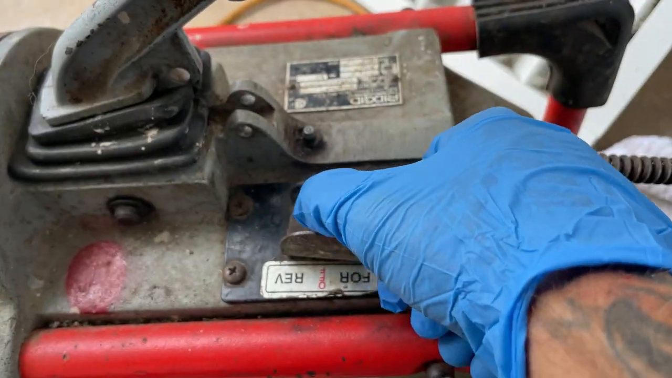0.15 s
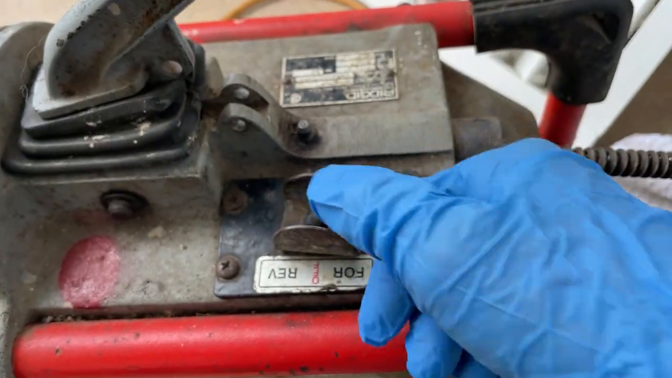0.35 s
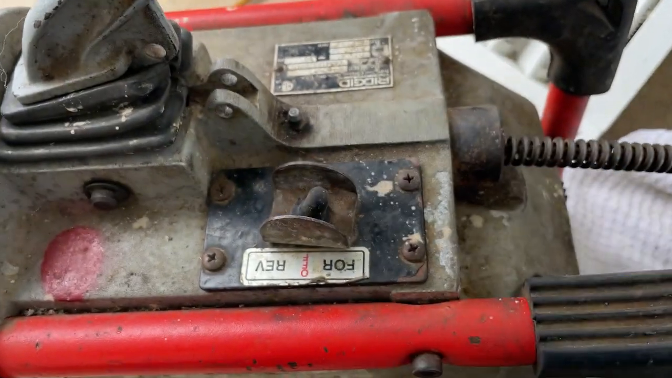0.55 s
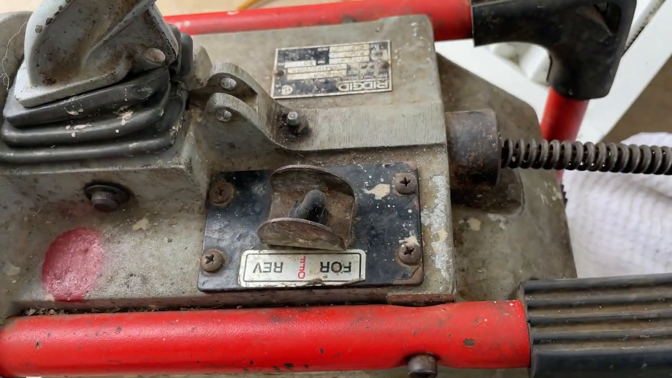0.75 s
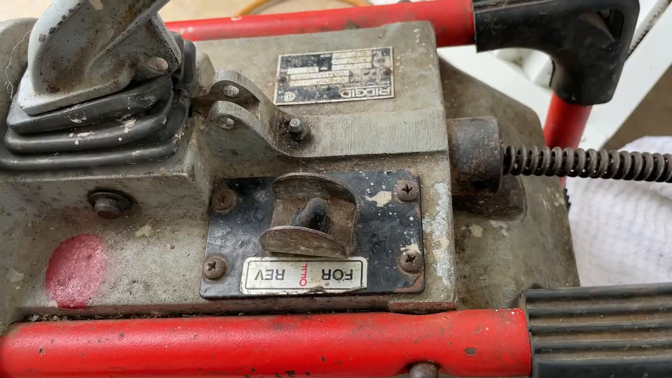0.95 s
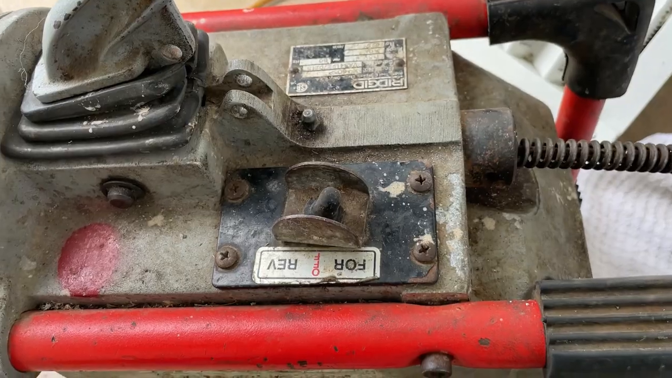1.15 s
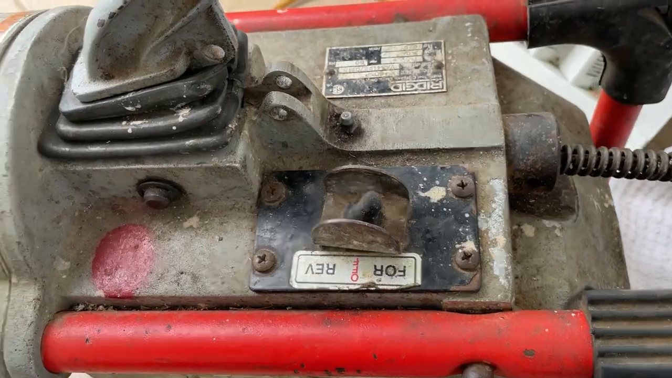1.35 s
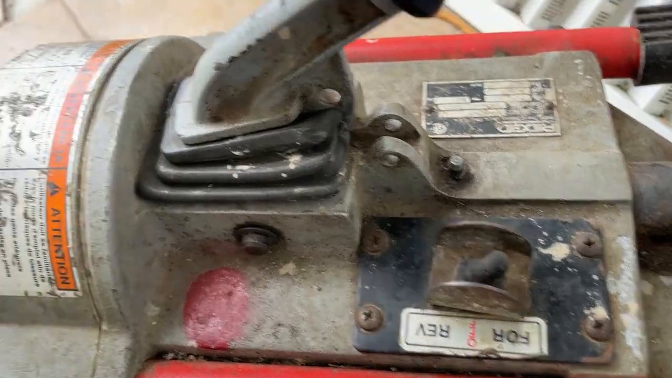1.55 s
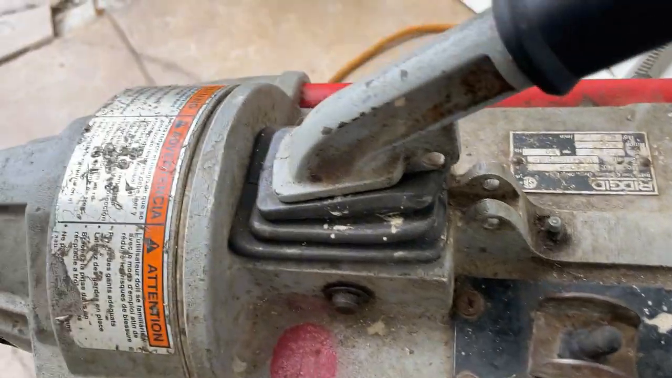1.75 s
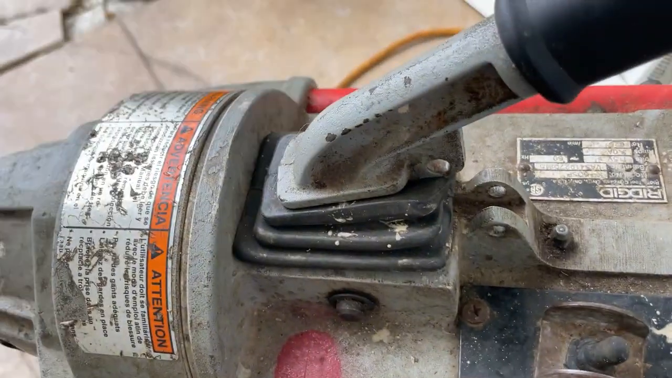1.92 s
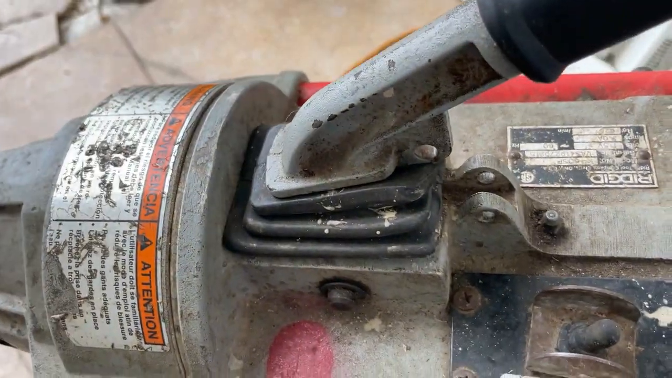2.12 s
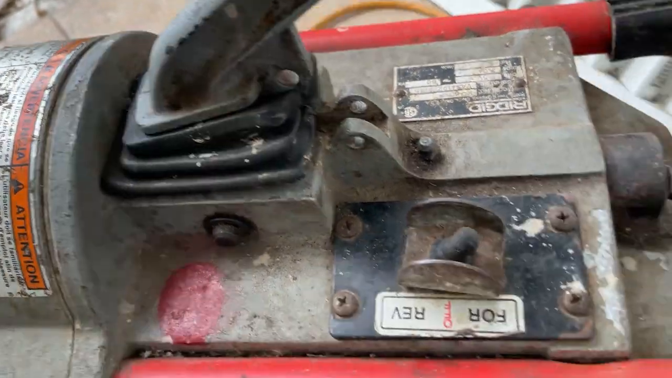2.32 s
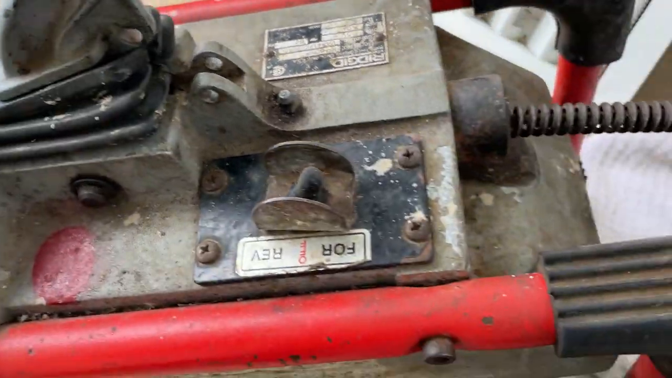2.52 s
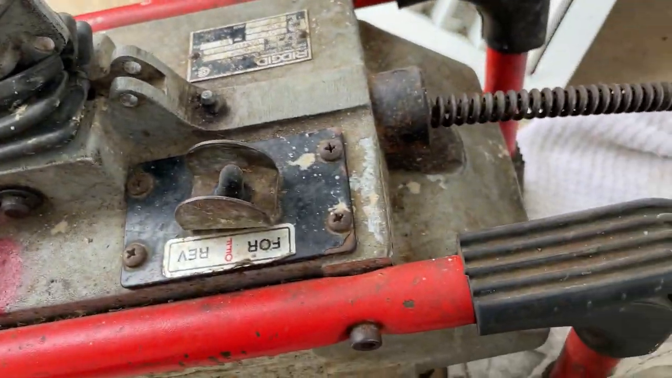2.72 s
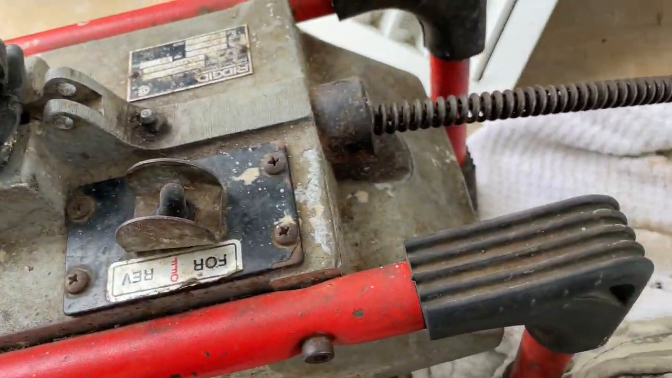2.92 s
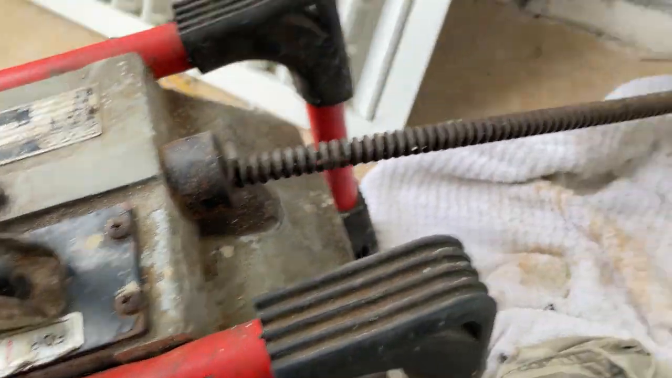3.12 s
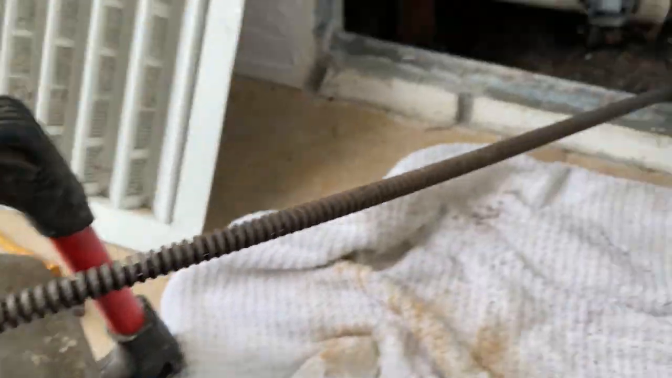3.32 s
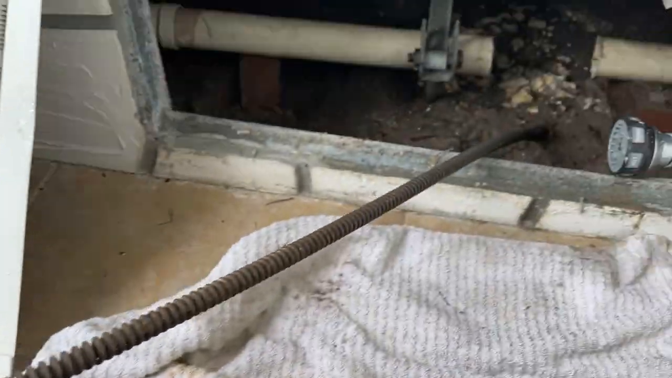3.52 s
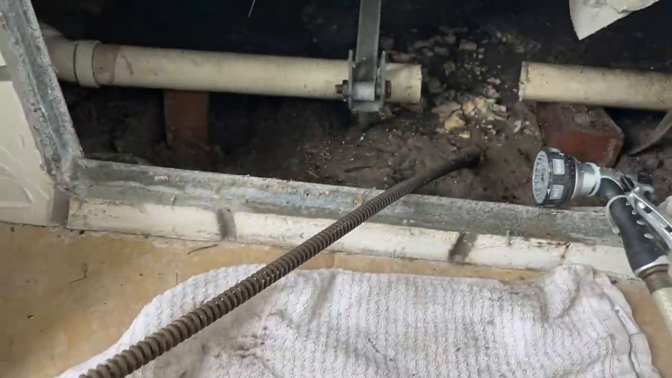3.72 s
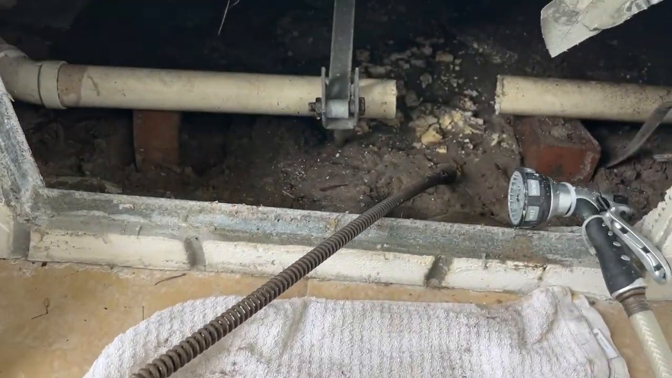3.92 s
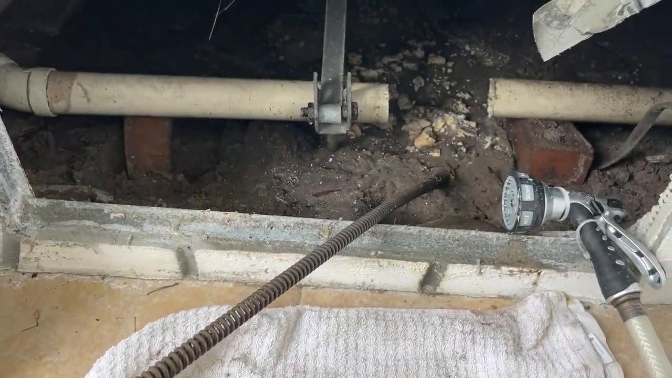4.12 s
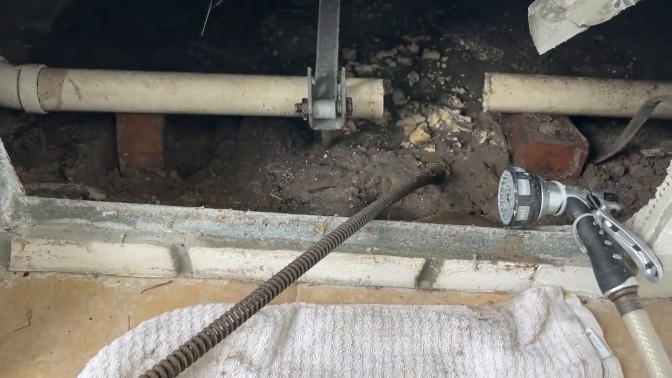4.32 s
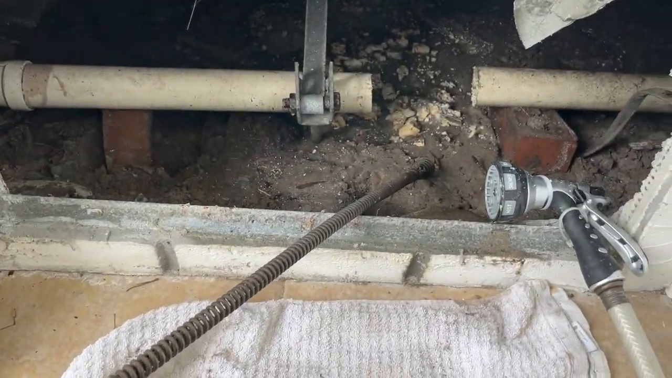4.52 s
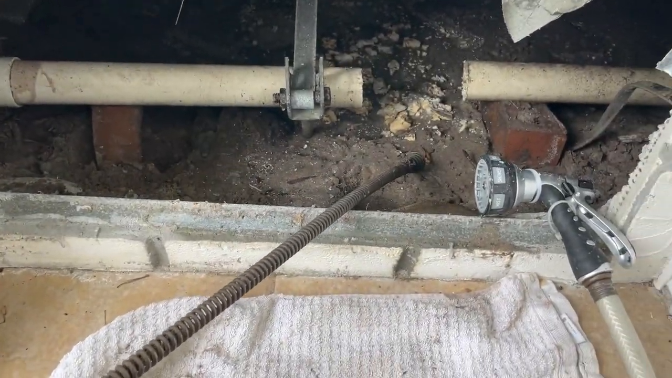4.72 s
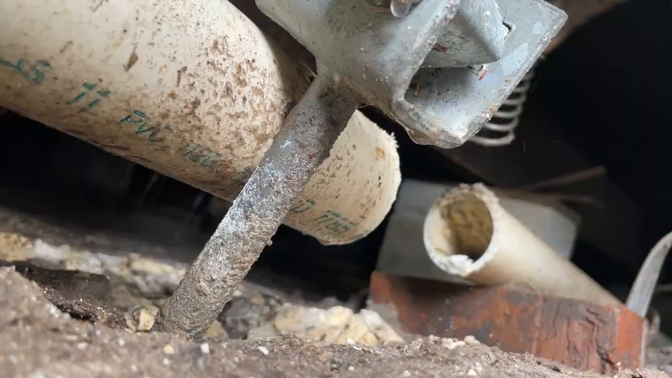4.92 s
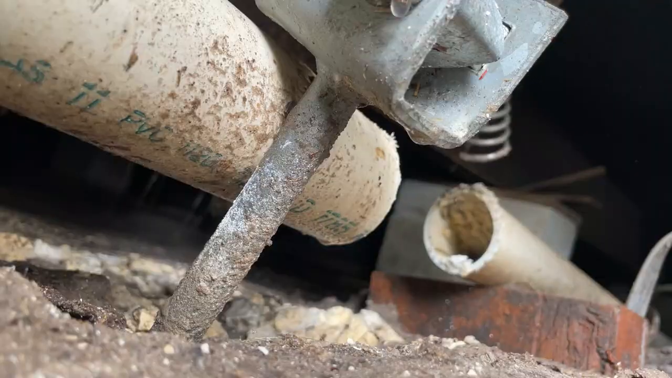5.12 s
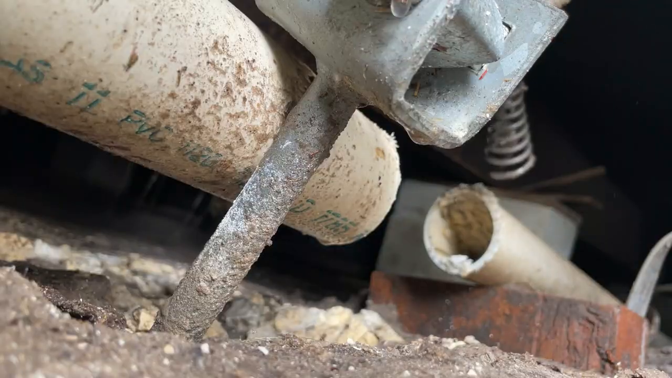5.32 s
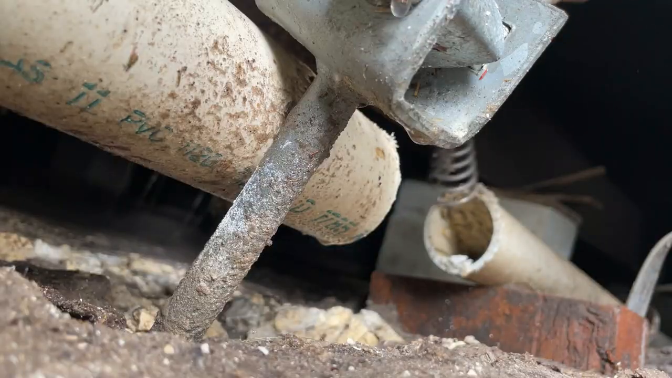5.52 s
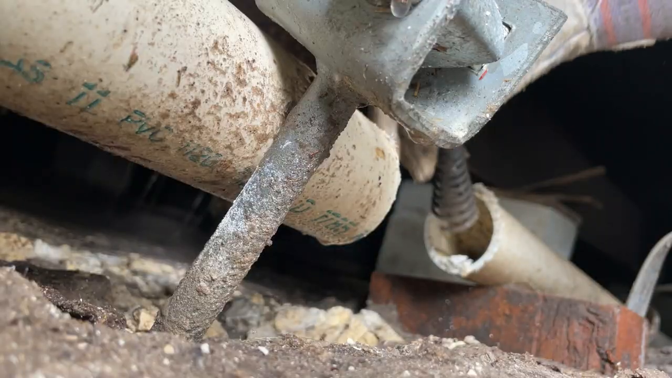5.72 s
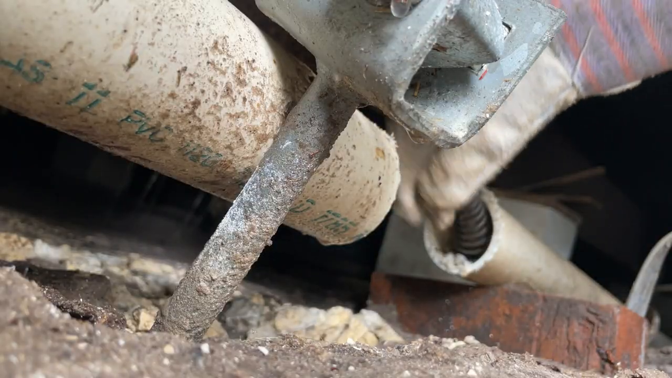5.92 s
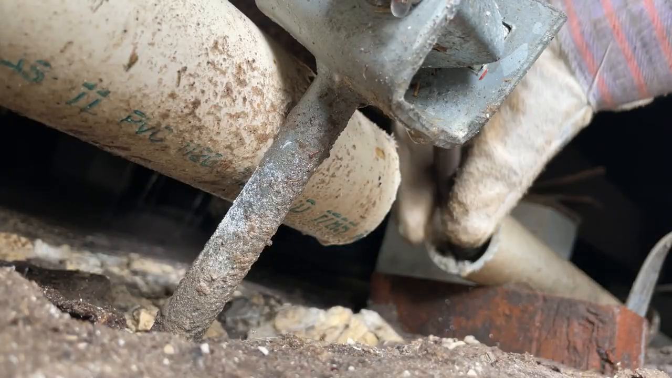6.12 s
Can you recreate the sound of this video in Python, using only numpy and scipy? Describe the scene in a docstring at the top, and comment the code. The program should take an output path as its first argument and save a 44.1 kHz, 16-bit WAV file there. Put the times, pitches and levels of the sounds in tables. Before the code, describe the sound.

Heavy switch clack, motor shudders up and hums with rapid thumping while a spinning coil cable rattles, squeals faintly, and finally scrapes into a plastic pipe.

```python
"""Drain-cleaning machine beside a house

An electric drain-cleaning machine is switched on and spins its coiled steel cable into a pipe.
The motor hums on mains and rotational lines, the belt drive thumps the housing once a turn, and
filtered noise gives the frame and the cable, which rattles, sings and ticks six times a turn.
The microphone starts at the machine, swings to a trench and ends under the floor, where the air rumbles."""
import sys
import numpy as np
from scipy import signal
from scipy.fft import rfft, irfft, next_fast_len
from scipy.io import wavfile
from scipy.ndimage import uniform_filter1d

SR = 44100
rng = np.random.default_rng(int(sys.argv[2]) if len(sys.argv) > 2 else 0)


def to_wav(s):
    """Save 16-bit WAV."""
    ch = np.atleast_2d(s).T  # columns
    pcm = np.round(np.clip(ch, -1, 1) * 32767)  # PCM
    wavfile.write(sys.argv[1], SR, pcm.astype(np.int16))


N = 276066
T = np.arange(N) / SR  # time axis, s

MAINS_HZ = 60
MOTOR_HZ, FIRST_THUMP_S = 29.875, .3634
CABLE_HZ, FIRST_TICK_S = 10.433, .2949
RUN_UP_S, RUN_UP_DB = 0.22, 17.5  # the frame's sound rises by this much after the switch
PORT_LAG_S = 0.000187  # the coil's treble reaches the microphone's right port this much later
YARD_WET_DB, YARD_T60_S = -10, .11  # faint reflections from ground and wall
CUTOFF_HZ = 15900

# Motor hum at each place: line_hz (nominal), level_db (rms)
HUM_MACHINE = [(120, -43.5), (300, -30), (420, -36.5), (450, -43.5), (480, -39.5), (540, -45), (630, -42.5)]
HUM_TRENCH = [(120, -39), (150, -42.5), (300, -36.5), (420, -34), (480, -45), (540, -51.5)]
HUM_UNDER = [(120, -41), (150, -44.5), (210, -44), (270, -39.5), (300, -41.5), (360, -40.5), (450, -48),
             (480, -44.5), (540, -45.5)]
# Hum lines locked to half the mains rate, the others follow the motor: order (multiple)
MAINS_ORDERS = (4, 5, 10, 16)
# Slow swell of the drone: time_s, housing_db, frame_db
DRONE = [(0.4, -4.5, 0), (1.5, 2.5, -0.5), (1.8, 2, -2.5), (2.35, 1.5, -2.5), (2.7, 0, 1), (3.85, 4, -1.5),
         (4.45, -1.5, -2), (5.4, 8, 4)]
# Growl of the starting current: line_hz, level_db (rms, before the swell)
GROWL = [(360, -31.5), (480, -29.5)]
# Swell of the growl: time_s, gain_db
GROWL_SWELL = [(0.13, -19), (0.19, -14), (0.255, -3), (0.33, -5), (0.4, -12), (0.5, -70)]
# One lap of the belt, a row for each of its four motor turns: thump_db, slap_db (of the cable)
BELT = [(-1, -11.5), (-1.5, -4), (-3, -38), (-7, -3.5)]
# Turns on which the thump has a set time and level: peak_s, peak_db
THUMPS = [(0.36, -12), (0.494, -16.5), (0.537, -14.5), (0.669, -18), (0.699, -17.5), (0.773, -11.5),
          (0.802, -14), (0.905, -13.5), (1.039, -18), (1.172, -15), (1.304, -18), (1.371, -17),
          (1.44, -13.5), (1.471, -16.5), (1.573, -13), (1.605, -14.5), (1.741, -16), (1.874, -14.5),
          (2.005, -13), (2.141, -12), (2.245, -16), (2.511, -10), (2.542, -13.5), (2.609, -14),
          (2.647, -16), (2.815, -17), (2.914, -16.5), (2.979, -16), (3.048, -15.5), (3.077, -18),
          (3.11, -20), (3.18, -11), (3.21, -17), (3.279, -17), (3.345, -16.5)]
# Resonances of housing and frame: mode_hz, width_hz, machine_db, trench_db, under_floor_db
FRAME = [(153, 65, -35, -4, -3.5), (258.2, 50, 0.5, -0.5, 1.5), (309.6, 37.4, 3, 2, 3),
         (338.4, 101, 1.5, -2.5, 3), (421.7, 34.5, -0.5, 1, -2), (474, 70, 1.5, -3.5, 4.5)]
# Spectrum of the rattle at each place: pitch_hz, level_db (relative)
RATTLE_MACHINE = [(350, -24.5), (600, 1), (720, -2.5), (999, -8), (1220, -8), (2240, -14), (2460, -11),
                  (3180, -17.5), (4100, -13), (5300, -20.5), (7600, -21.5), (9880, -100)]
RATTLE_TRENCH = [(350, -50), (600, 3), (947, -1), (1030, -8), (1300, -2), (1610, -7), (1850, -3.5),
                 (2630, -6), (3210, -8.5), (4100, -3), (7600, -25.5), (9880, -100)]
RATTLE_UNDER = [(350, -27), (600, 3.5), (1080, -8.5), (1250, -4), (1470, -11.5), (1800, -9), (2190, -13),
                (4660, -18.5), (7600, -20.5), (9880, -95)]
# Resonances of the steel cable at each place: mode_hz, width_hz, level_db (relative)
RING_MACHINE = [(1770, 150, -6.5), (3430, 42, -6), (3770, 56, -6), (4056, 81, -1), (7310, 60, -1)]
RING_TRENCH = [(925, 35, 0), (1325, 35, -5), (2374, 54, 0.5), (2570, 30, 3), (2750, 22, 3), (4000, 310, 0),
               (5820, 180, -9.5)]
RING_UNDER = [(1800, 62, -16), (6830, 89, -6.5)]
# Friction on the cable, slack, then taken up, at last guided into the pipe: time_s, gain_db
FRICTION = [(0.2, -5.5), (0.225, -17), (0.264, -13), (0.273, -4.5), (0.299, -9), (0.308, 1.5), (0.36, 4.5),
            (4.96, 5.5), (5.0, -1), (5.07, 5), (5.16, -2), (5.28, 6.5), (5.41, 0), (5.83, 0), (5.95, 4),
            (6.26, 3)]
# Loud single clacks: the switch contact rebounding, the cable knocking, at last loud ticks of the coil:
# start_s, peak_db, treble_db (relative to the peak)
CLACKS = [(0.196, -32.5, -17), (0.267, -35.5, -9), (0.305, -32, -5), (0.931, -23, -12), (1.565, -25, -8),
          (1.698, -23, -12), (1.864, -26.5, -10), (1.97, -25, -11), (2.101, -21.5, -14), (2.132, -29, -9),
          (2.506, -24, -10), (2.639, -23, -7), (2.803, -21, -18), (2.937, -25.5, -13), (3.071, -24, -19),
          (3.171, -25, -18), (5.57, -37, -1.5), (5.621, -31, -23), (5.889, -36, 3.5), (5.95, -30, -2),
          (5.966, -31, -1), (6.017, -36, 1), (6.179, -33.5, 3)]
# Spectra of a clack and of its bright edge: pitch_hz, level_db (relative)
CLACK_COLOUR = [(450, -7), (700, -0.5), (1130, 6.5), (1800, -5.5), (2400, -10), (4000, -35)]
CLACK_EDGE = [(1700, -13), (2800, 4), (4200, -3), (7000, 6), (8300, -33), (10500, 5), (15000, -17)]
# The cable sings briefly as it bends: start_s, end_s, start_hz, end_hz, level_db (rms)
SINGS = [(1.42, 2.44, 2550, 2550, -43.5), (1.543, 2.35, 1330, 1322, -48.5), (2.48, 3.218, 2400, 2370, -45),
         (3.18, 3.998, 2506, 2910, -50), (3.42, 3.822, 2775, 2735, -47), (3.703, 5.01, 1800, 1793, -46.5),
         (4.2, 4.6, 3450, 3430, -48), (4.75, 5.15, 3490, 3460, -50), (4.95, 5.38, 1874, 1856, -52),
         (5.95, 6.35, 1815, 1800, -52.5)]
# Where in each turn the coil catches: share (of the turn), level_db (relative)
COIL = [(0.163, 4), (0.328, 2), (0.517, -6), (0.637, 0.5), (0.824, -0.5), (0.955, -9)]
# Spectrum of the coil's ticks: pitch_hz, machine_db, trench_db, under_floor_db (relative)
TICK = [(6900, -2, -35, -24), (7210, -23, 8, -1), (9500, 9.5, 4.5, 0), (10130, 3.5, 12.5, 3),
        (11100, 0.5, 5, 0.5), (12400, -0.5, 5.5, -0.5), (14800, 4.5, 6, -0.5), (15400, -18, -8, -10)]
# The switch snaps over: start_s, level_db
SWITCH = [(0.1299, -14.5)]
# Spectrum of the snap: pitch_hz, level_db (relative)
SWITCH_COLOUR = [(400, 4), (2300, -6), (3000, 5.5), (3700, 3), (4600, -7), (6600, 1), (9000, -14),
                 (11400, 8), (12800, -12)]
# Modes of the switch's metal case: mode_hz, level_db, t60_s
SWITCH_CASE = [(507, -27, 0.064), (1740, -26.5, 0.066), (3180, -37, 0.048), (4651, -33, 0.11),
               (5840, -19, 0.036), (7600, -22, 0.06), (11800, -33, 0.06)]
# The drive takes up its slack with a jolt: start_s, level_db
JOLT = [(0.345, -19)]
# The cable end scrapes the pipe mouth: start_s, length_s, level_db, ring_db (relative to the stroke)
SCRAPES = [(5.27, 0.063, -36, 18.5), (5.926, 0.067, -44.5, 3), (6.008, 0.057, -38, 6)]
# Resonances of the plastic rim: mode_hz, width_hz, level_db (relative)
RIM = [(1200, 60, 4.5), (2630, 57, 5), (5990, 150, -4), (7310, 89, -3)]
# Spectra of the low rumble and of the outdoor air: pitch_hz, level_db (relative)
RUMBLE = [(20, -53), (36, -16), (50, 0.5), (68, 0.5), (90, -5.5), (125, -22.5), (200, -17)]
YARD_AIR = [(100, 6), (200, -9), (340, 4.5), (700, -10.5), (1100, -14), (3000, -33.5), (12000, -42)]
# Swells of the rumble: top_s, length_s, gain_db
SWELLS = [(4.54, 0.1, 6), (5.212, 0.12, 8.5), (5.38, 0.065, 7), (5.553, 0.3, 5), (5.688, 0.12, 7),
          (5.93, 0.063, 5.5), (6.08, 0.09, 7), (6.172, 0.13, 7.5)]
# Position of the microphone: time_s, place (0 machine, 1 trench, 2 under the floor)
PLACE = [(0, 0), (3.25, 0.18), (3.48, 0.94), (4.92, 1), (5.05, 2)]
# Stereo balance: time_s, left_minus_right_db
PAN = [(0.8, -2), (2.23, -3.5), (3.2, -1), (3.85, 0.5), (4.95, 0.5), (5.05, -3.5), (6.26, -3)]
# Base levels, a row for each place: thump_db, frame_db, rattle_db, tick_db, rumble_db
LEVELS = [(-19, -33, -35.5, -45.5, -39), (-29, -35.5, -39, -43, -38), (-28.5, -39, -34.5, -41.5, -29)]
# Correlation of left and right: pitch_hz, machine, trench, under_floor (-1 to 1)
LIKENESS = [(130, 0.83, 0.77, 0.95), (286, 0.95, 0.46, -0.75), (660, 0.73, 0.45, -0.77),
            (1380, 0.18, 0.13, -0.64), (3100, 0.55, 0.15, 0.37), (6900, -0.006, 0.24, -0.096)]


def hum(places, housing_db, frame_db, waver_db=1.5, flutter_db=1.76, wobble=0.62, port_phase=0.5):
    """Harmonic radiation: magnetic lines on the mains, rotational ones on the motor, their levels wavering
    slowly."""
    out = np.zeros((2, N))
    for here, lines in zip(places, (HUM_MACHINE, HUM_TRENCH, HUM_UNDER)):
        for hz, db in lines:
            order = round(hz / MOTOR_HZ)
            line_hz = order * (MAINS_HZ / 2 if order in MAINS_ORDERS else MOTOR_HZ)
            phase = 2 * np.pi * line_hz * T + wobble * drift(6.4)
            swell_db = housing_db
            if line_hz != 5 * MAINS_HZ:
                # only the housing's own line keeps step with the thumps; higher lines come from the frame
                ports = np.array([[-1], [1]])
                phase = phase + rng.uniform(0, 2 * np.pi) + port_phase * line_hz / 600 * ports
                swell_db = frame_db * (line_hz > 5 * MAINS_HZ)
            level_db = db + swell_db + waver_db * drift(3.4) + flutter_db * drift(33)
            out += here * np.sqrt(2) * from_db(level_db) * np.sin(phase)
    spun_up = np.clip((T - .2) / 0.18, 0, 1) ** 2
    return out * spun_up


def growl(wobble=0.67):
    """Magnetic force: the motor hums roughly, its phase unsteady, while it draws its starting current."""
    swell_db, = in_time(GROWL_SWELL)
    lines = sum(from_db(db) * np.sin(2 * np.pi * hz * T + wobble * drift(32)) for hz, db in GROWL)
    return np.sqrt(2) * from_db(swell_db) * lines


def motor_turns():
    """Periodic excitation: the time of each motor turn and its step in the lap of the belt."""
    times = np.arange(FIRST_THUMP_S, T[-1], 1 / MOTOR_HZ)
    return times, np.array(BELT)[np.arange(len(times)) % len(BELT)]


def thumps(thump_db, rise_s=0.0075, lead_s=0.0043, uneven_db=1.5, phase_spread=0.58, housing_hz=288):
    """Driven resonance: each turn presses the motor on the housing, which booms near the mains phase."""
    times, belt = motor_turns()
    chance = rng.standard_normal((len(times), 2))
    peak_db = np.interp(times, T, thump_db) + belt[:, 0] + uneven_db * chance[:, 0]
    starts = times - lead_s
    for s, db in THUMPS:
        turn = np.argmin(abs(times - s))
        starts[turn], peak_db[turn] = s - rise_s, db
    mains_phase = 2 * np.pi * 5 * MAINS_HZ * (starts + rise_s)  # fifth harmonic at each peak
    phase = mains_phase + phase_spread * chance[:, 1]
    heights = from_db(peak_db) * np.exp(1j * phase)
    return np.imag(bursts(starts, heights, rise_s, housing_hz))


def slaps(depth, rise_s, lead_s, uneven_db):
    """Amplitude modulation: the shaking is hardest just ahead of each thump; mean power 1."""
    times, belt = motor_turns()
    strength = from_db(belt[:, 1] + uneven_db * np.clip(rng.standard_normal(len(times)), -2, 1))
    return rms_one(1 + depth * bursts(times - lead_s, strength, rise_s))


def lapping(noise, repeats):
    """Cyclic excitation: the worn belt shakes alike on each lap; repeats is the lap-to-lap likeness."""
    lap, repeats = round(SR * len(BELT) / MOTOR_HZ), np.clip(repeats, 0, 1)
    out = noise.copy()
    for i in range(lap, N, lap):
        previous = out[:, i - lap:i][:, :N - i]
        out[:, i:i + lap] = repeats * previous + np.sqrt(1 - repeats ** 2) * noise[:, i:i + lap]
    return out


def frame(places, frame_db):
    """Modal response: belt, bearings and cable shake the housing and tubular frame at their resonances."""
    shaking = lapping(placed_noise(places), repeats=0.74)
    shaking = shaking * slaps(depth=0.53, rise_s=0.005, lead_s=0.01, uneven_db=10.5)
    out = np.zeros((2, N))
    for hz, width, *place_db in FRAME:
        mode = evened(resonate(resonate(shaking, hz, width), hz, width), span_s=0.255)
        out += mode * sum(here * from_db(db) for here, db in zip(places, place_db))
    return from_db(frame_db) * out


def rattle(places, rattle_db, ring_db=4.0, swell_db=4.0):
    """Impact noise: dense steel contacts excite cable modes, which swell and fade as the cable whips."""
    contacts = rms_one(5.5 + grains(per_s=600, spread_db=-1.0, rise_s=0.00034))
    shaken = slaps(depth=0.43, rise_s=0.0051, lead_s=0.0071, uneven_db=11.0)
    pressure = contacts * shaken * from_db(rattle_db)
    force = pressure * lapping(placed_noise(places), repeats=0.35)
    spectra = (RATTLE_MACHINE, RATTLE_TRENCH, RATTLE_UNDER)
    modes = (RING_MACHINE, RING_TRENCH, RING_UNDER)
    out = np.zeros((2, N))
    for here, spectrum, rings in zip(places, spectra, modes):
        steel = np.zeros((2, N))
        for hz, width, db in rings:
            steel += from_db(db + ring_db + swell_db * drift(4.9)) * resonate(force, hz, width)
        out += here * (colour(force, spectrum) + steel)
    return out


def clacks(near, turn_db=-30.0, uneven_db=2.5, lead_s=0.00544, rise_s=0.0012):
    """Impact: loud single clacks and, at the machine, a light one ahead of each thump."""
    s, db, treble_db = np.transpose(CLACKS)
    times, belt = motor_turns()
    chance_db = uneven_db * np.clip(rng.standard_normal(len(times)), -2, 1)
    light = np.interp(times, T, near) * from_db(turn_db + belt[:, 1] + chance_db)
    contact = np.maximum(bursts(s, from_db(db), rise_s), bursts(times - lead_s, light, rise_s))
    edge = bursts(s, from_db(db + treble_db), rise_s)
    blow = colour(contact * stereo_noise(alike=0.72), CLACK_COLOUR)
    return blow + colour(edge * stereo_noise(alike=0.56), CLACK_EDGE)


def singing(fade_s=0.13, wobble=0.82, flutter_db=2.5, port_phase=0.92):
    """Self-sustained vibration: rubbing keeps one cable mode ringing unsteadily, its pitch set by the bend."""
    out = np.zeros((2, N))
    for start, end, start_hz, end_hz, db in SINGS:
        pitch_hz = np.interp(T, [start, end], [start_hz, end_hz])
        phase = 2 * np.pi * np.cumsum(pitch_hz) / SR + wobble * drift(24)
        fade = np.clip(np.minimum(T - start, end - T) / fade_s, 0, 1)
        level = fade * from_db(db + flutter_db * drift(23))
        apart = port_phase * drift(11.0) * np.array([[.5], [-.5]])
        on = level > 0
        out[:, on] += np.sqrt(2) * level[on] * np.sin(phase[on] + apart[:, on])
    return out


def ticks(places, tick_db, rise_s=0.0022, uneven_db=3.0, hiss=0.38, near_hiss=0.52, jitter_s=0.00018):
    """Stick and slip: the turning coil catches six times a turn over the fine hiss of sliding wire."""
    turns = np.arange(FIRST_TICK_S, T[-1], 1 / CABLE_HZ)
    catch_rows = [(s + share / CABLE_HZ, db) for s in turns for share, db in COIL]
    times, db = np.transpose([row for row in catch_rows if row[0] < T[-1]])
    chance = rng.standard_normal((len(times), 2))
    heights = from_db(db + uneven_db * np.clip(chance[:, 1], -2, 1))
    catches = bursts(times - rise_s + jitter_s * chance[:, 0], heights, rise_s)
    sliding = (hiss + near_hiss * places[0]) * from_db(2.5 * drift(36))
    friction = np.hypot(catches, sliding)
    force = evened(friction * rng.standard_normal((1, N)), span_s=0.37)
    hz, *colours = np.transpose(TICK)
    heard = sum(here * colour(force, np.c_[hz, db])[0] for here, db in zip(places, colours))
    return from_db(tick_db) * heard


def switch(snap_s=0.00087, tail_db=-17.5, tail_t60=0.12, scatter_db=1.0, lag_s=0.00006):
    """Impulse response: a snap rings the metal case; the direct sound reaches the right port later."""
    s, db = SWITCH[0]
    age = np.maximum(T - s, 0)
    tail = from_db(tail_db - 60 * age / tail_t60) * (T > s)
    shape = bursts([s], [1.], snap_s) + tail
    direct = right_late(rng.standard_normal(N), lag_s)
    noise = direct + from_db(scatter_db) * rng.standard_normal((2, N))
    case = np.zeros(N)
    for hz, mode_db, t60 in SWITCH_CASE:
        case += from_db(mode_db - 60 * np.minimum(age / t60, 10)) * np.sin(2 * np.pi * hz * age)
    return colour(from_db(db) * shape * noise, SWITCH_COLOUR) + right_late(case, lag_s)


def jolt(rise_s=0.0099):
    """Transient load: as the motor gets going the drive grabs and the whole machine shudders."""
    s, db = np.transpose(JOLT)
    shudder = bursts(s, from_db(db), rise_s) * stereo_noise(alike=0.8)
    spectrum = [(250, 9), (500, 10), (1100, 2), (1600, -13), (5000, -16.5), (10500, -17), (15000, -25)]
    return colour(shudder, spectrum)


def scrape():
    """Friction excitation: the wire tip drags over the plastic rim in grainy strokes that ring the rim."""
    strokes, ringing = np.zeros(N), np.zeros(N)
    for s, length, db, ring_db in SCRAPES:
        stroke = from_db(db) * np.interp(T, [s, s + length / 10, s + length], [0, 1, 0])
        strokes += stroke
        ringing += stroke * from_db(ring_db)
    catching = grains(per_s=1600, spread_db=2, rise_s=.0003) * stereo_noise(alike=.8)
    rings = sum(from_db(db) * resonate(ringing * catching, hz, width) for hz, width, db in RIM)
    spectrum = [(900, -6), (2500, 0), (6000, -2), (11000, -4), (15000, -21)]
    return colour(strokes * catching, spectrum) + rings


def yard(x, wet_db, t60):
    """Reflection: decaying echoes from ground and wall, different in each channel, join the direct sound."""
    age = T[:SR // 4]
    decay = from_db(-60 * age / t60) * (age > .002)  # no echo in the first 2 ms
    echoes = rng.standard_normal((2, len(age))) * decay
    echoes *= from_db(wet_db) / np.linalg.norm(echoes, axis=1, keepdims=True)
    reflected = signal.oaconvolve(x, echoes, axes=1)[:, :N]
    return (x + reflected) / np.hypot(1, from_db(wet_db))


def air(under, rumble_db, cavity_hz=55, cavity_width_hz=14, cavity_db=5.5):
    """Cavity resonance: a swelling rumble booms in the space under the floor, over a faint outdoor wash."""
    swell_db = sum(db * np.clip(1 - (2 * (T - s) / length) ** 2, 0, 1) for s, length, db in SWELLS)
    shared = colour(stereo_noise(alike=1.0), RUMBLE, size=16384)
    cavity = rms_one(resonate(shared, cavity_hz, cavity_width_hz))
    rumble = colour(stereo_noise(alike=0.96), RUMBLE, size=16384) + under * from_db(cavity_db) * cavity
    wash = from_db(-41.5) * colour(stereo_noise(alike=0.063), YARD_AIR)
    return from_db(rumble_db + swell_db) * evened(rumble, span_s=0.087) + wash


def from_db(db):
    """Logarithmic level: turns decibels into an amplitude ratio."""
    return 10 ** (np.asarray(db) / 20)


def rms_one(x):
    """Normalisation: scales a signal to unit mean power."""
    return x / np.sqrt(np.mean(x ** 2) + 1e-20)


def evened(x, span_s):
    """Level control: dividing by the moving rms takes the slow swells out of a noise; rms near 1."""
    power = uniform_filter1d(np.mean(x ** 2, axis=0), max(2, int(span_s * SR)))
    return x / np.sqrt(power + 1e-12)


def in_time(rows):
    """Linear interpolation: each column of a table as a curve in time."""
    s, *columns = np.transpose(rows)
    return [np.interp(T, s, c) for c in columns]


def drift(rate_hz):
    """Low-pass noise: smooth chance with spread 1, from two equal poles at a fortieth of the sample rate."""
    r = np.exp(-80 * np.pi * rate_hz / SR)
    white = rng.standard_normal(N // 40 + 2002)
    slow = signal.lfilter([1], [1, -2 * r, r * r], white)[2000:]  # drop the settling
    return np.interp(np.arange(N) / 40, np.arange(len(slow)), rms_one(slow))


def colour(x, points, size=4096):
    """Minimum-phase filtering: a causal filter of the given spectrum; white noise keeps its power."""
    hz, db = np.transpose(points)
    octave = np.log2(np.maximum(np.fft.rfftfreq(size, 1 / SR), 1))
    outside = np.abs(octave - np.clip(octave, np.log2(hz[0]), np.log2(hz[-1])))
    # beyond the end points the gain falls 30 dB an octave, for two octaves
    gain = from_db(np.interp(octave, np.log2(hz), db) - 30 * np.minimum(outside, 2))
    cepstrum = irfft(np.log(gain))[:size // 2]
    cepstrum[1:] *= 2  # folding the cepstrum makes the phase minimal
    response = irfft(np.exp(rfft(cepstrum, size)))
    return signal.oaconvolve(np.atleast_2d(x), response[None] / np.linalg.norm(response), axes=1)[:, :N]


def resonate(x, hz, width_hz):
    """Damped oscillator: one resonance, gain 1 on top."""
    r = np.exp(-np.pi * width_hz / SR)
    zeros = np.array([1, 0, -1]) * (1 - r * r) / 2
    poles = [1, -2 * r * np.cos(2 * np.pi * hz / SR), r * r]
    return signal.lfilter(zeros, poles, x)


def bursts(times, heights, rise_s, ring_hz=None):
    """Superposition: contacts swell for rise_s and die away; with ring_hz they ring as they do."""
    marks = np.zeros(N, np.asarray(heights).dtype)
    np.add.at(marks, np.clip((np.asarray(times) * SR).astype(int), 0, N - 1), heights)
    age = T[:SR // 8]
    shape = (age / rise_s * np.exp(1 - age / rise_s)) ** 2
    if ring_hz:
        shape = shape * np.exp(2j * np.pi * ring_hz * (age - rise_s))
    return signal.oaconvolve(marks, shape)[:N]


def grains(per_s, spread_db, rise_s):
    """Poisson process: the envelope of random tiny impacts of uneven size; rms 1."""
    count = int(10 * per_s)
    times = np.cumsum(rng.exponential(1 / per_s, count))
    sizes = from_db(spread_db * np.minimum(rng.exponential(1, count), 3))
    return rms_one(bursts(times, sizes * (times < T[-1]), rise_s))  # none beyond the end


def stereo_noise(alike):
    """Coherence: white noise in two channels with the given correlation."""
    alike = np.clip(alike, 0, 1)
    return np.sqrt(alike) * rng.standard_normal(N) + np.sqrt(1 - alike) * rng.standard_normal((2, N))


def placed_noise(places):
    """Spectral coherence: stereo noise whose channels are as alike, pitch by pitch, as at each place."""
    size = next_fast_len(N)
    hz, *columns = np.transpose(LIKENESS)
    pitch = np.log(np.maximum(np.fft.rfftfreq(size, 1 / SR), 1))
    white, out = rfft(rng.standard_normal((2, size))), 0
    for here, column in zip(places, columns):
        alike = np.clip(np.interp(pitch, np.log(hz), column), -1, 1)
        shares = np.sqrt([(1 + alike) / 2, (1 - alike) / 2])
        mid, side = irfft(white * shares, size)[:, :N]
        out = out + here ** 2 * np.array([mid + side, mid - side])
    return out


def right_late(x, lag_s):
    """Travel time: the same sound in both channels, the right one a little later."""
    size = next_fast_len(N + SR // 100)
    turn = np.exp(-2j * np.pi * np.fft.rfftfreq(size, 1 / SR) * lag_s)
    return np.array([x, irfft(rfft(x, size) * turn, size)[:N]])


def scene():
    """Superposition of sources: the machine heard from three places, with switch, jolt, scrape and air."""
    place, = in_time(PLACE)
    places = [np.sqrt(np.clip(1 - abs(place - k), 0, 1)) for k in range(3)]  # equal-power blend
    levels_db = [np.interp(place, range(3), column) for column in np.transpose(LEVELS)]
    thump_db, frame_db, rattle_db, tick_db, rumble_db = levels_db
    housing_swell_db, frame_swell_db = in_time(DRONE)
    friction_db, = in_time(FRICTION)
    pan_db, = in_time(PAN)
    switch_s = SWITCH[0][0]
    starting = np.clip(1 - (T - switch_s) / RUN_UP_S, 0, 1)

    body = hum(places, housing_swell_db, frame_swell_db) + growl()
    body = body + thumps(thump_db + housing_swell_db)
    body = body + frame(places, frame_db + frame_swell_db - RUN_UP_DB * starting)
    contacts = rattle(places, rattle_db + friction_db) + clacks(places[0])
    clatter = yard(contacts, YARD_WET_DB, YARD_T60_S) + singing()
    treble = right_late(ticks(places, tick_db + friction_db), PORT_LAG_S)
    machine = (body + clatter) * from_db(pan_db * [[.5], [-.5]]) + treble
    return machine * (T > switch_s) + switch() + jolt() + scrape() + air(places[2], rumble_db)


def record(dry):
    """Saturation and band limit: the highest peaks are rounded and the top is cut steeply."""
    rounded = dry / (1 + np.abs(dry / .48) ** 4) ** (1 / 4)
    return signal.sosfilt(signal.ellip(10, .2, 80, CUTOFF_HZ, fs=SR, output="sos"), rounded)


dry = scene()
out = record(dry)
to_wav(out)
```